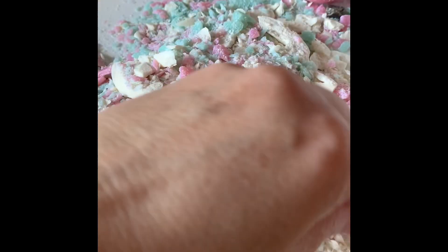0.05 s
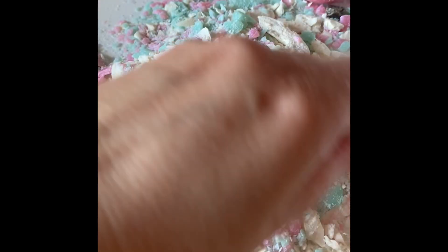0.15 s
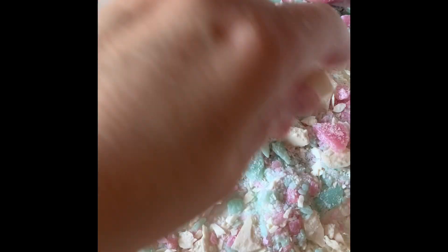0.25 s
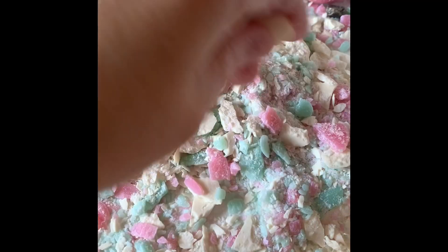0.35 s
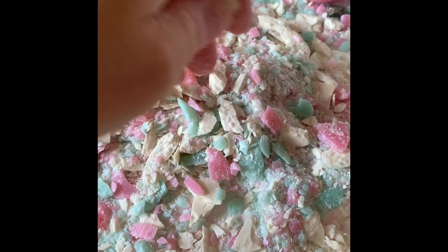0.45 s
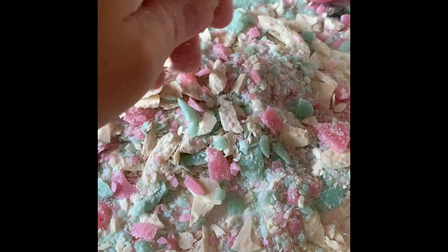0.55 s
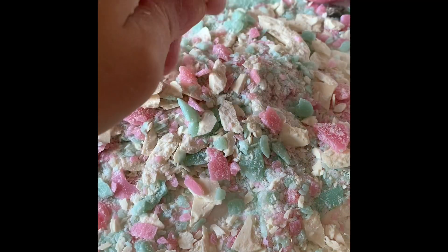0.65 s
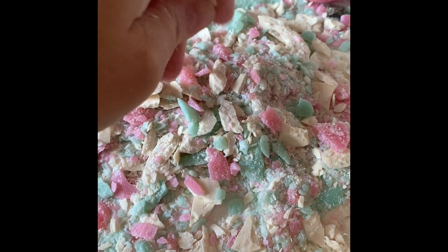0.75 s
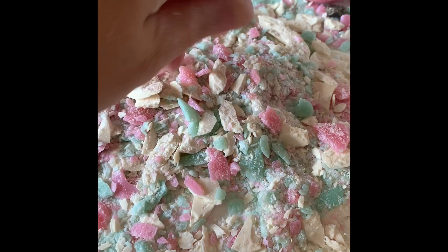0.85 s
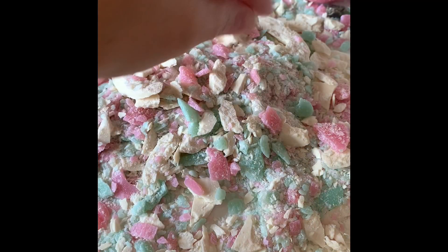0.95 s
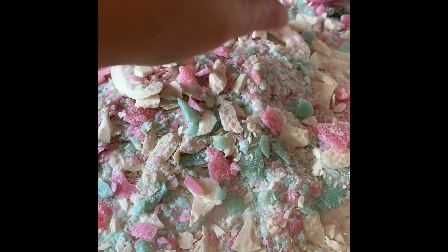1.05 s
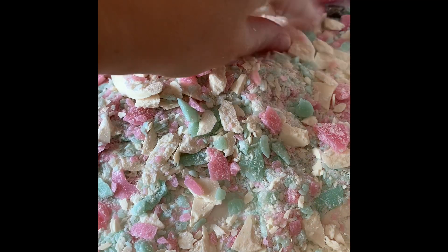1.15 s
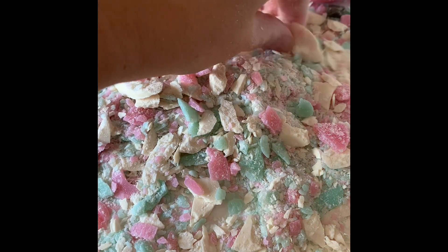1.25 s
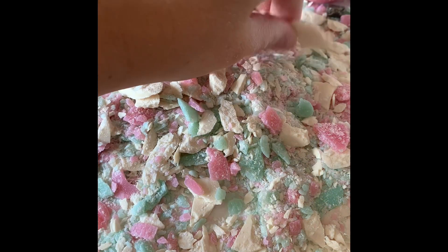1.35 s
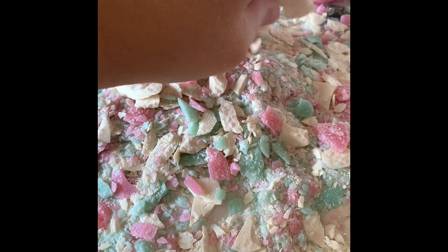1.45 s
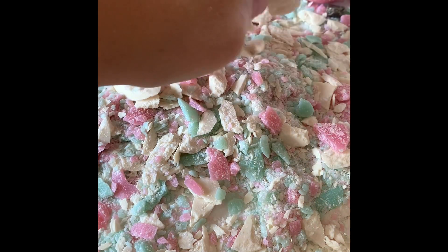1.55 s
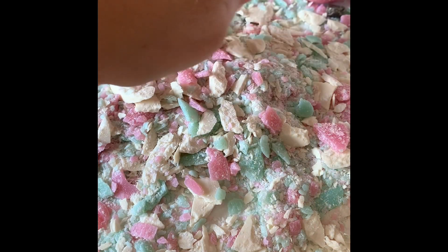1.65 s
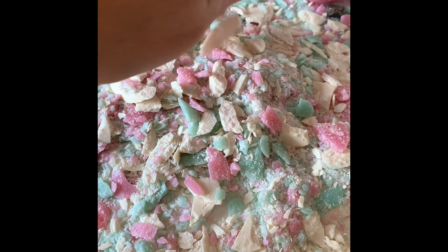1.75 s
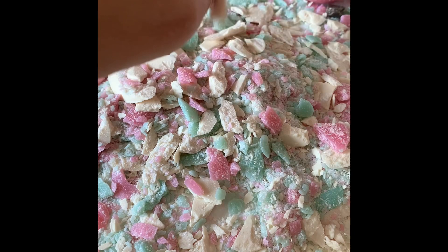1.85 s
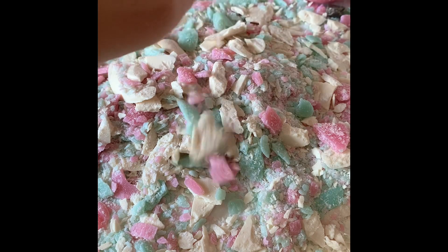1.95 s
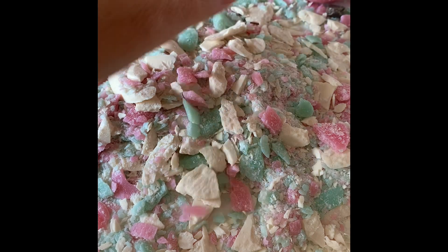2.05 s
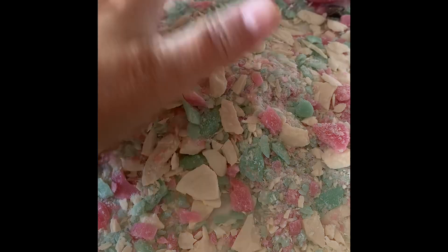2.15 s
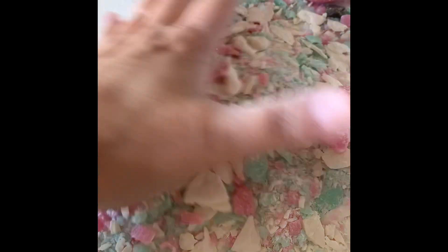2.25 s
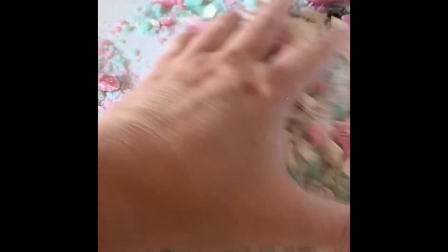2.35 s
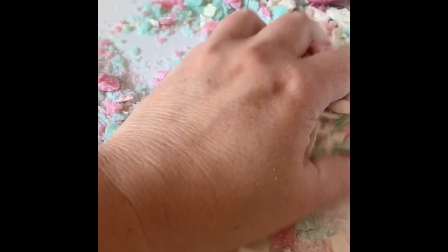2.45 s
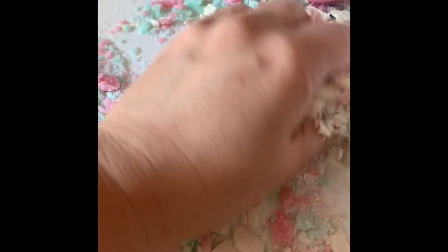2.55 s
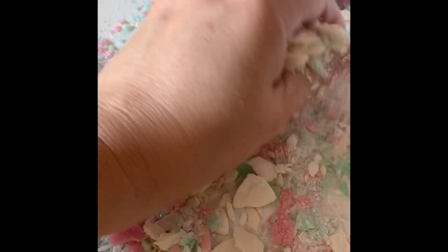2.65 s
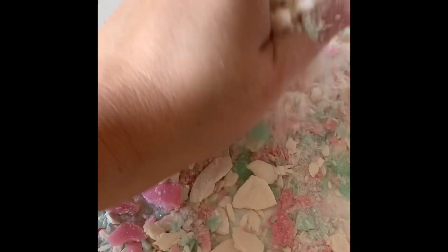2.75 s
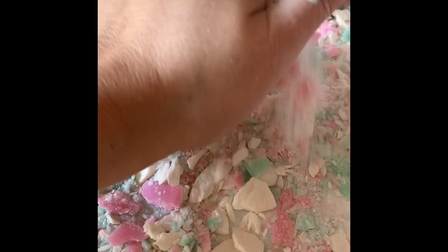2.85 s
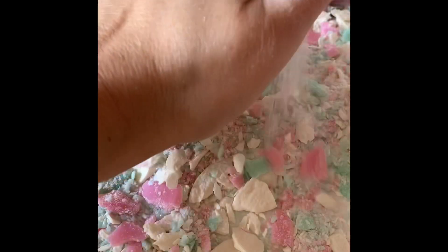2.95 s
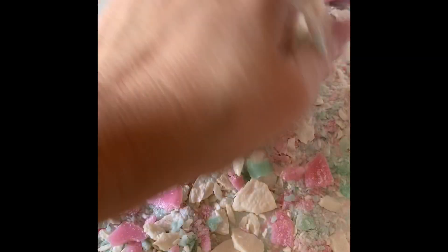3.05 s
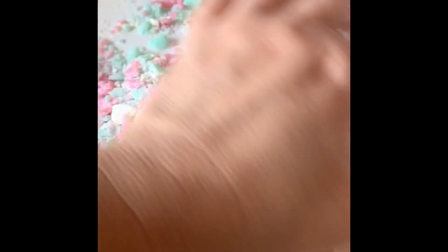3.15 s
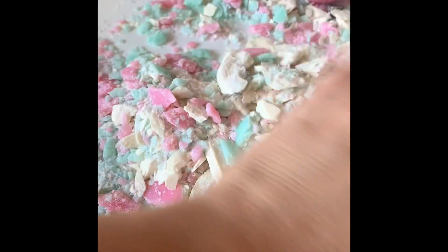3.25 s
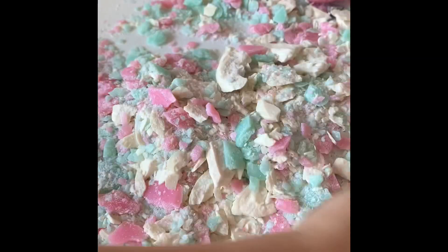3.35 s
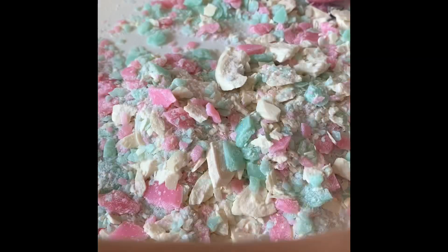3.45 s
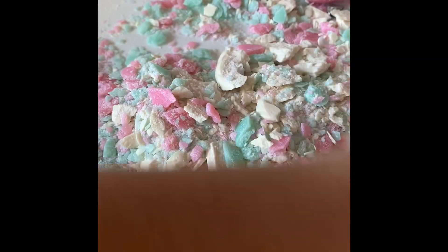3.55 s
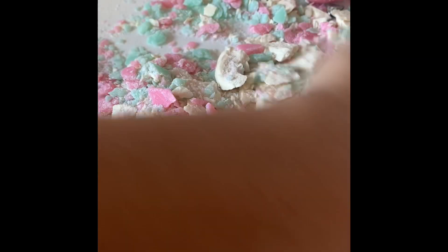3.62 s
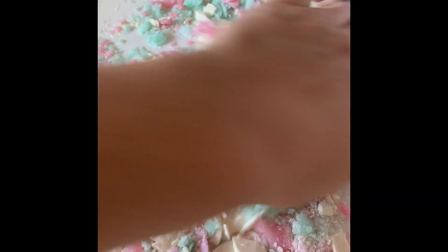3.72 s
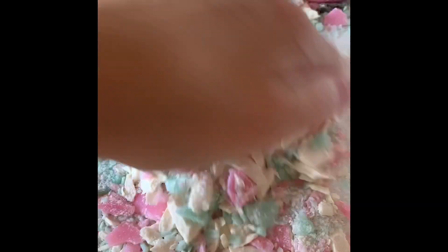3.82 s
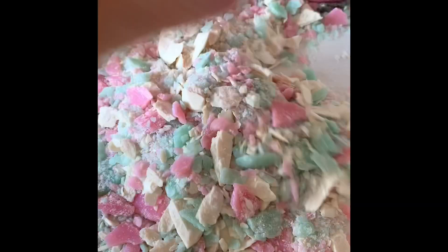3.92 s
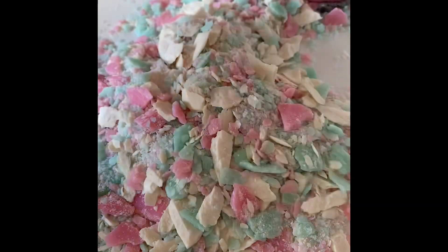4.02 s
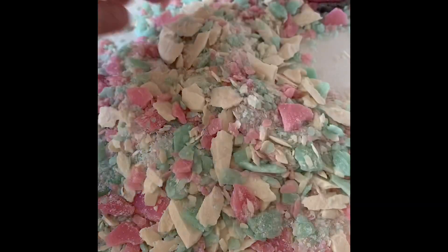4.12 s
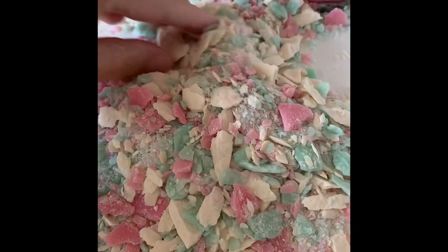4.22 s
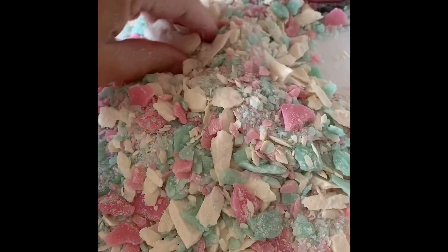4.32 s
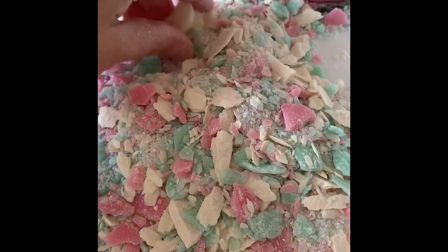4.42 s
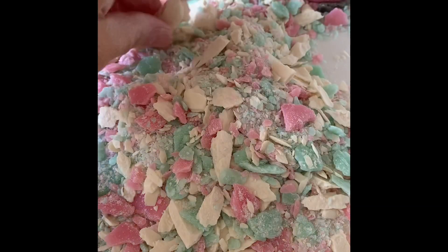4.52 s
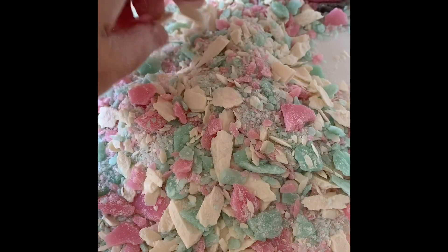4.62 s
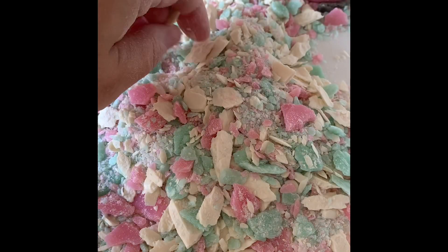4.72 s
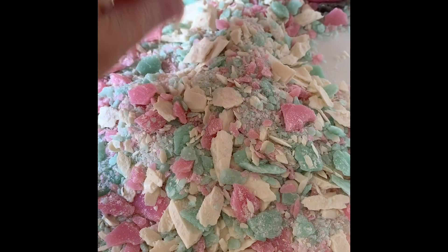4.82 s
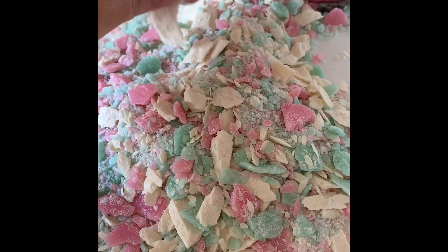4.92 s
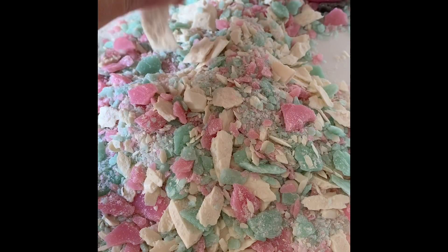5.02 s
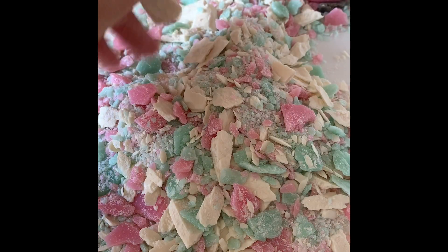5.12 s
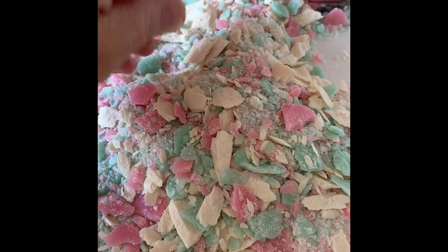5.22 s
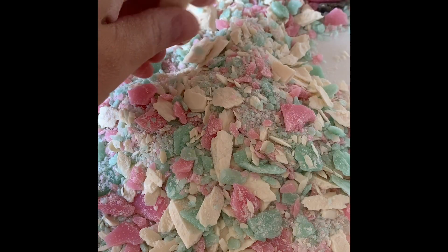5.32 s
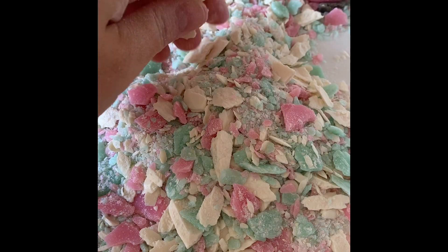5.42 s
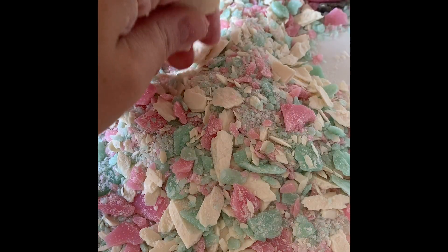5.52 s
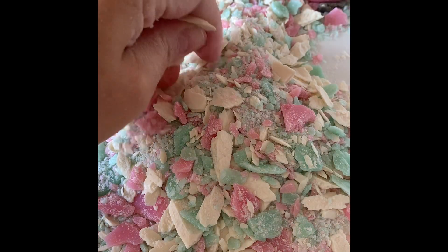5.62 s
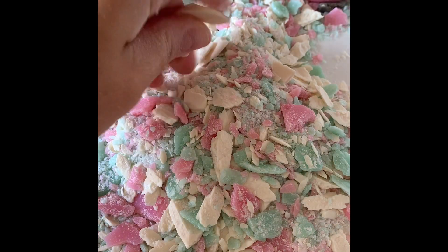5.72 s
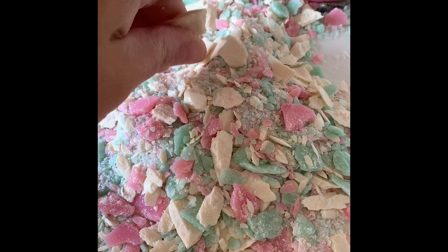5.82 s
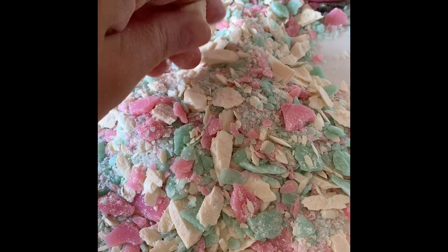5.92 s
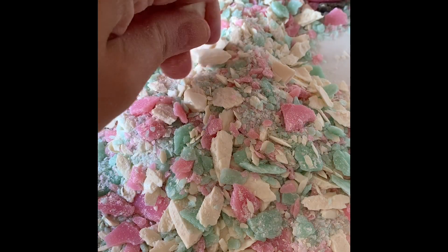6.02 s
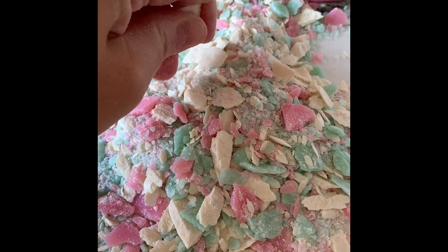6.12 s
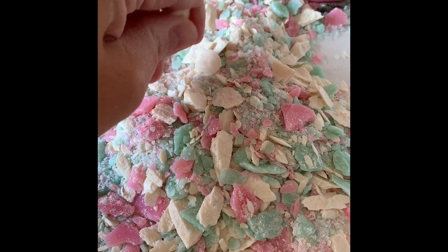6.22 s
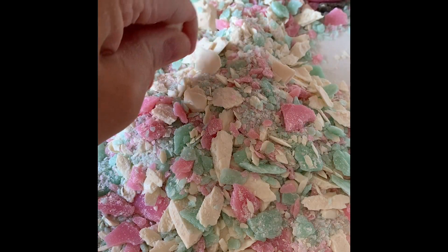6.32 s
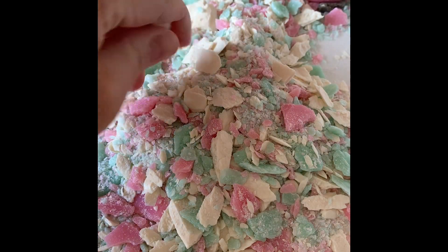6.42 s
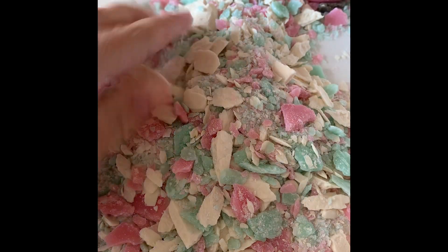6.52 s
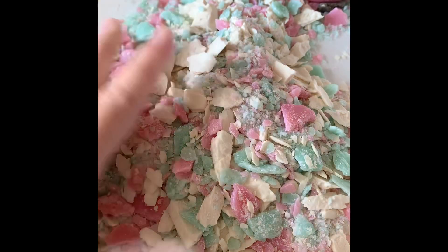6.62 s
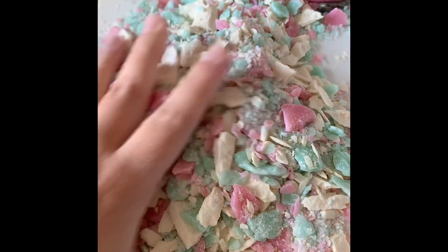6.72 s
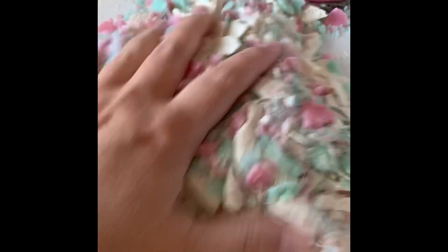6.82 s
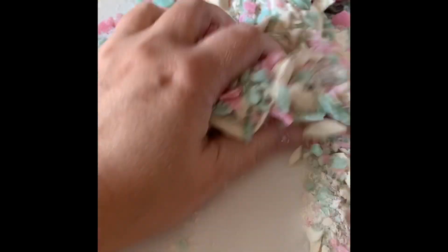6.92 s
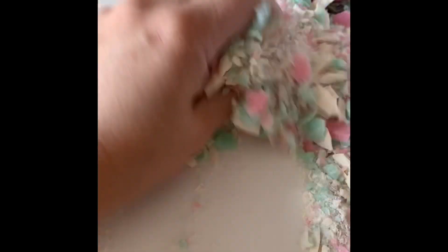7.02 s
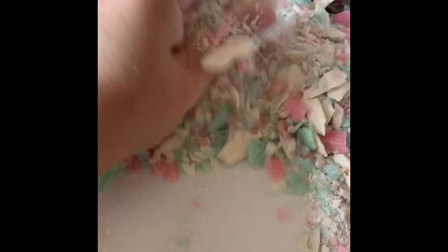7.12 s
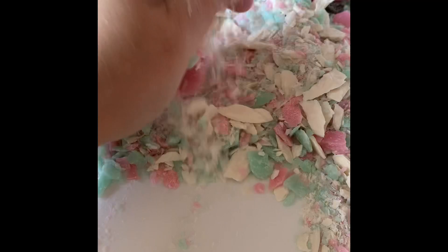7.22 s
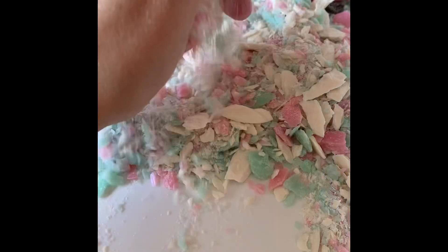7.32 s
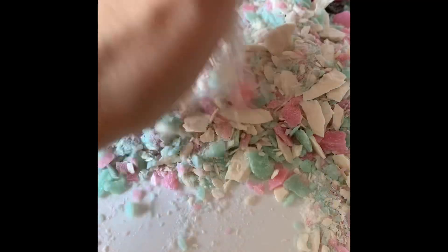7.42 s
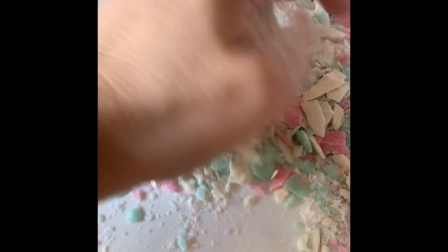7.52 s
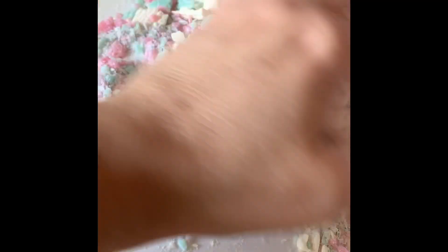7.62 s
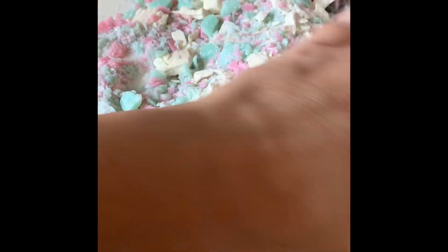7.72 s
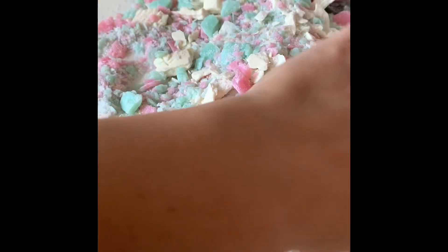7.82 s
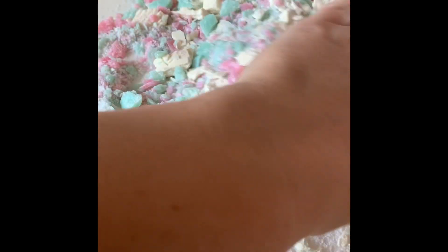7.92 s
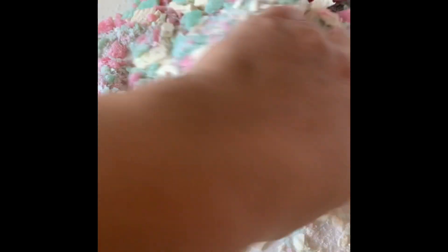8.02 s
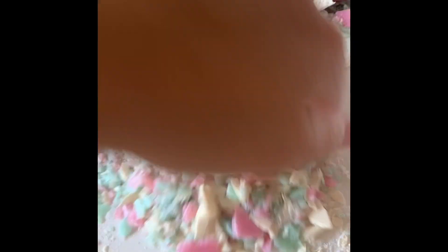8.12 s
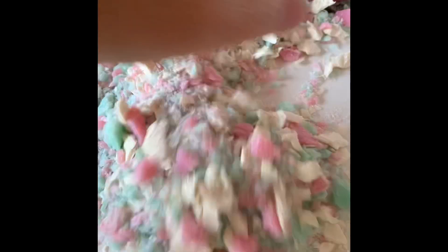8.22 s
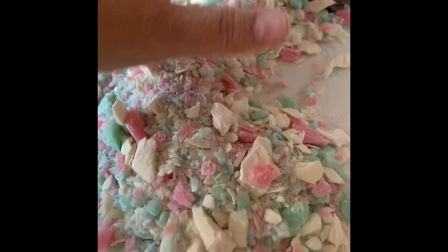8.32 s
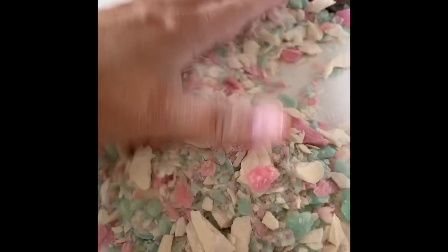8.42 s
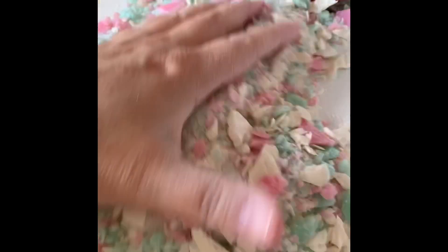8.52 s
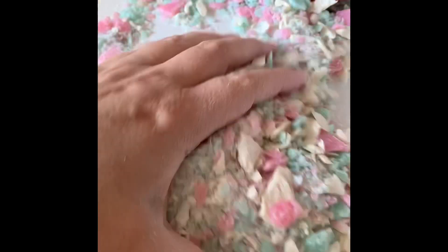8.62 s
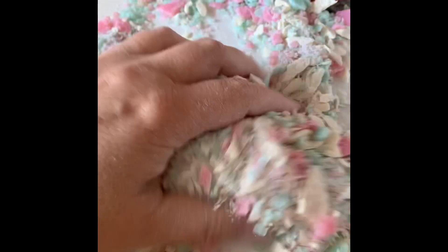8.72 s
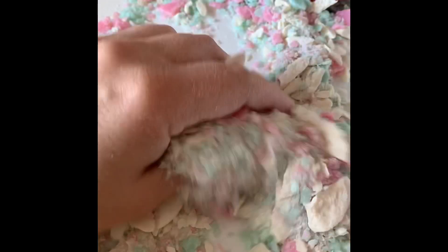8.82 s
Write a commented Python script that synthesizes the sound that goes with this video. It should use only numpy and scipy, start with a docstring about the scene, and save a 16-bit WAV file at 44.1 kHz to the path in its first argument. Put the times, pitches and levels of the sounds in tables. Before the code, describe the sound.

A low, unsteady room hum lies under close, dry sounds with a short small-room echo and a wide stereo image. Barely audible scrapes come first, then at 0.6 seconds a sharp brittle snap with a tiny thump. From 0.8 to 2 light rubbing, ticks and small knocks come in separate bursts, with a weaker snap at 1.9. From 2.2 to 3.4 the hand rakes the soap heap loudly: crunching chunks, woody clacks, cracking flakes, fizzing crumbs and soft low bumps. A smooth scraping sweep from 3.4 to 3.9 sinks in pitch. Gentle crackles and scrapes between 4.2 and 5.0 fade to near silence, broken by clear snaps at 5.5 and 6.0. Stirring restarts around 6.4 and swells at 6.7, with the hardest knocks near 7.05. Crunching strokes and rattling debris continue in waves through 8.8, then settle.

```python
"""A low, wavering room hum and faint scrapes, then a snap: a hand rakes and squeezes dry crushed soap on a table.
Chunks rub and knock (grains and dying sines over table modes), crumbs fizz (dense clicks), thin flakes crack
(ringing ticks); four times the fingers snap a piece (fracture pulse and sinking thump).
Strokes swell and settle; one long sweep, grains through moving resonances, sinks in pitch overall.
A small room answers the soap sounds; left and right differ in phase and level, varying with frequency."""
import sys
import numpy as np
from scipy import signal
from scipy.fft import rfft, irfft, next_fast_len
from scipy.io import wavfile
from scipy.ndimage import uniform_filter1d

SR = 44100
rng = np.random.default_rng(int(sys.argv[2]) if len(sys.argv) > 2 else 0)


def transcribe(signal):
    """Save signal, clipped to [-1, 1], as a 16-bit WAV file at the path in sys.argv[1]."""
    frames = np.atleast_2d(signal).T
    limited = np.clip(frames, -1, 1)
    pcm = np.round(limited * 32767).astype(np.int16)
    wavfile.write(sys.argv[1], SR, pcm)


N = 390726
TIME_S = np.arange(N) / SR

# Event levels and spectra are relative: each source trims or filters them further.
# low hum spectrum: [f/Hz, level/dB per Hz]
AIR_SPECTRUM = [(20, -24), (45, 4.5), (130, 0), (190, -5.5), (240, 0.5), (320, -15), (450, -21),
                (800, -32.5), (3000, -31), (9000, -29), (16000, -35)]
# room decay: [f/Hz, t60/s]
ROOM_DECAY = [(100, 0.42), (500, 0.19), (2000, 0.44), (6000, 0.13), (15000, 0.02)]
# room echo: [f/Hz, level/dB]
ROOM_LEVEL = [(100, -2), (500, -9), (2000, -8), (6000, -8), (15000, -20.5)]
# stereo phase: [f/Hz, lead of left/rad]
STEREO_LEAD = [(20, 0.5), (600, 0.46), (1000, 0.48), (1800, 0.13), (2400, 0.97), (2780, 2), (3600, 2),
               (4200, 1.37), (4800, 3.5), (5450, 3.5), (6400, 5), (7700, 5.5), (9500, 6.5), (11300, 10),
               (13400, 9.5), (14900, 12), (16500, 15)]
# stereo balance: [f/Hz, left minus right/dB]
STEREO_BALANCE = [(60, -2), (95, -0.5), (150, -3), (240, -5.5), (380, 1.5), (600, -5), (950, -3.5),
                  (1500, -0.1), (2380, -6.5), (2780, 0), (3200, -6.5), (3770, 0.5), (5980, -1.5), (9470, 1),
                  (15000, -0.5)]
# tabletop modes: [f/Hz, level/dB, t60/s]
TABLE_MODES = [(415, -11.5, 0.044), (520, 1.5, 0.051), (584.3, -4.5, 0.5), (1006, -11, 0.071),
               (1148, -4, 0.055), (1480, -5, 0.029), (1540, -4.5, 0.024), (2020, -11, 0.12),
               (2786, -8.5, 0.087)]
# hand bumps the table through the heap: [t/s, level/dB, f/Hz]
THUD_EVENTS = [(0.904, -47.5, 78.5), (1.157, -49, 80.5), (1.954, -43, 80), (2.206, -38, 84),
               (2.363, -22.5, 98), (3.2, -49, 80.5), (4.262, -41, 89), (4.577, -47, 99), (6.729, -33.5, 77),
               (7.549, -37.5, 122), (7.745, -33.5, 80.5), (8.417, -44, 68.4), (8.751, -35, 132)]
# piece snaps between the fingers: [t/s, crack level/dB, crack f/Hz, recoil level/dB, recoil starting f/Hz]
SNAP_EVENTS = [(0.6025, -16, 5040, -40.5, 296), (1.9408, -24.5, 10230, -49, 385),
               (5.5441, -18, 7800, -36, 249), (6.045, -25, 9300, -42.5, 320)]
# thin flake breaks: [t/s, level/dB, flake f/Hz]
CRACK_EVENTS = [(0.803, -63, 8040), (1.013, -54.5, 7000), (1.0872, -45, 6700), (1.16, -46.5, 6550),
                (1.397, -47.5, 7060), (1.4064, -45.5, 7540), (1.6432, -47, 7460), (1.619, -57, 4000),
                (1.7786, -49, 6760), (1.82, -57, 3000), (2.0135, -55, 3000), (2.566, -34.5, 3430),
                (2.5737, -46, 8800), (2.584, -35.5, 7450), (2.6835, -31, 3200), (2.7957, -46, 7250),
                (2.9048, -49, 8500), (3.1394, -45, 8100), (3.3522, -54, 2870), (3.2007, -33.5, 3140),
                (3.2235, -40, 3500), (3.284, -48, 8500), (3.2945, -36, 8400), (3.37, -37, 3780),
                (3.8638, -50, 8000), (3.8944, -45, 9150), (4.2895, -51, 3820), (4.5645, -55, 7500),
                (4.602, -35.5, 11400), (4.606, -37, 8000), (4.6741, -38, 2970), (4.7032, -38.5, 9000),
                (4.7146, -43, 2500), (4.772, -41, 2780), (4.778, -38, 6440), (4.817, -59, 6960),
                (4.9808, -47.5, 6700), (5.0185, -45, 7200), (5.1207, -48, 9800), (5.3, -57.5, 8000),
                (5.803, -64, 3000), (5.914, -70, 2400), (6.5505, -51, 7550), (6.5955, -46.5, 7500),
                (6.7125, -51, 8000), (6.7332, -32.5, 3600), (6.9031, -37, 7000), (7.008, -42, 8000),
                (7.0448, -20.5, 2860), (7.112, -35, 8560), (7.16, -37.5, 5700), (7.1886, -43.5, 7440),
                (7.295, -41, 7560), (7.4619, -34.5, 7800), (7.4932, -37.5, 7540), (7.6695, -32, 6800),
                (7.7462, -24, 5600), (8.2254, -47.5, 7500), (8.3073, -50.5, 7500), (8.35, -60, 2600),
                (8.4012, -40.5, 7700), (8.7518, -24.5, 3540), (8.7644, -34, 7300), (8.839, -38, 2800)]
# chunk strikes the table or a neighbour: [t/s, level/dB, f/Hz]
KNOCK_EVENTS = [(.078, -47.5, 1900), (.897, -44.5, 1100), (1.014, -48, 1290), (1.119, -46, 890),
                (1.158, -31, 468), (1.161, -32, 1460), (1.213, -41, 480), (1.264, -30.5, 540),
                (1.283, -35.5, 617), (1.398, -41, 1900), (1.44, -52, 553), (1.618, -49, 1500),
                (1.754, -45.5, 537), (1.781, -45, 1480), (1.819, -47.5, 1530), (1.941, -37, 1480),
                (1.947, -44, 1650), (1.953, -35.5, 480), (1.981, -44, 1700), (1.994, -37, 1610),
                (2.0, -31.5, 1840), (2.0135, -29, 1300), (2.021, -33.5, 520), (2.0531, -36.5, 1470),
                (2.169, -33.5, 456), (2.188, -33, 1430), (2.386, -21.5, 1280), (2.413, -25, 1530),
                (2.426, -33, 1400), (2.4841, -26, 616), (2.5658, -13.5, 1640), (2.643, -26.5, 690),
                (2.6841, -10.5, 1234), (2.697, -25, 1420), (2.7235, -19.5, 760), (2.7947, -23, 1350),
                (2.852, -26, 520), (2.892, -34.5, 546), (3.0185, -40, 1360), (3.129, -32, 1500),
                (3.151, -28.5, 620), (3.163, -27, 1500), (3.2008, -15, 1350), (3.223, -24.5, 1730),
                (3.297, -21.5, 1310), (3.3517, -9.5, 1710), (3.3525, -27.5, 640), (3.3685, -28, 2140),
                (3.3935, -21, 1750), (3.462, -28, 636), (3.857, -43, 1300), (3.927, -33, 920),
                (4.247, -36, 520), (4.29, -44, 1500), (4.5145, -46.5, 530), (4.7032, -28, 1420),
                (4.7143, -25.5, 1330), (4.778, -32.5, 1480), (4.982, -37.5, 660), (5.019, -38, 1390),
                (5.021, -42, 520), (5.897, -59.5, 600), (6.495, -39, 1500), (6.509, -38, 1620),
                (6.596, -36, 564), (6.685, -39, 600), (6.7334, -19, 1840), (6.816, -23.5, 440),
                (6.9034, -26.5, 1160), (6.979, -35, 544), (7.0342, -13, 1220), (7.0411, -13, 1170),
                (7.0455, -36, 1100), (7.054, -3.5, 1150), (7.061, -15.5, 594), (7.078, -26, 1170),
                (7.124, -28.5, 563), (7.154, -22.5, 1590), (7.1597, -18.5, 1540), (7.289, -27.5, 1390),
                (7.3395, -32.5, 466), (7.356, -36, 1450), (7.3835, -36, 1300), (7.5412, -24, 1220),
                (7.562, -36, 1400), (7.575, -24.5, 1320), (7.664, -26.5, 1440), (7.671, -21.5, 570),
                (7.6965, -29, 1460), (7.7465, -18.5, 1120), (8.306, -34.5, 1170), (8.327, -30.5, 1210),
                (8.35, -17.5, 2180), (8.587, -26, 1360), (8.659, -24, 1080), (8.748, -15.5, 1440),
                (8.752, -16.5, 600), (8.779, -26, 1100), (8.838, -25.5, 995)]
# palm sweep: [t/s, centre f/Hz, level/dB]
SWEEP_PATH = [(3.34, 1950, -80), (3.38, 1895, -42), (3.46, 1610, -40), (3.54, 1760, -40.5),
              (3.62, 1610, -44.5), (3.7, 1270, -44.5), (3.8, 1170, -42.5), (3.87, 987, -58.5),
              (4.049, 900, -78.5)]
# hand pushes through the heap: [start t/s, length/s, rise/s, chunk level/dB,
# edges above chunks/dB, crumbs above chunks/dB]
STROKE_EVENTS = [(0.0, .11, 0.037, -72, 4, -19), (0.123, 0.1, 0.022, -80, 1, 7),
                 (.81, 0.085, 0.075, -70.5, 2, -7), (0.885, 0.029, 0.0054, -58.5, -7, -9),
                 (0.958, 0.055, 0.036, -64, -21, -18), (1.088, .09, 0.044, -49.5, -5.5, -13.5),
                 (1.185, .085, 0.026, -51.5, -3.5, -13), (1.344, .086, .03, -54.5, -9, -15.5),
                 (1.462, 0.18, 0.024, -66, -21, -18.5), (1.595, 0.036, 0.016, -60.5, -15, -13),
                 (1.745, 0.046, 0.017, -59, -17, -15), (1.937, 0.084, 0.0068, -53, -4, -17),
                 (2.165, 0.037, 0.0069, -46, 0, -14.5), (2.228, .25, 0.065, -38, 0, -11.5),
                 (2.513, 0.17, 0.03, -46.5, 2.5, -7), (2.736, 0.19, 0.022, -51, -4.5, -9.5),
                 (2.964, 0.23, 0.055, -53.5, -2, -9), (3.098, 0.14, 0.027, -44.5, -4, -15.5),
                 (3.23, .11, .04, -53, -11, -6.5), (3.355, 0.28, 0.064, -53.5, 1, 3.5),
                 (3.492, 0.31, 0.055, -42, 0.5, -6.5), (3.81, .14, 0.037, -48, -22, -18.5),
                 (3.973, 0.099, 0.053, -59.5, -19, -25), (4.058, 0.059, .04, -67, -9.5, -28),
                 (4.198, 0.076, 0.029, -43.5, -2.5, -22.5), (4.298, 0.1, 0.032, -55.5, 2.5, -13),
                 (4.437, 0.088, 0.025, -59, 1, -13.5), (4.574, 0.034, 0.021, -60, 4.5, 2.5),
                 (4.661, .16, 0.043, -70.5, 11.5, -9.5), (4.985, 0.064, 0.012, -58, -12, -17.5),
                 (5.22, .06, .03, -79, -2.5, -6), (5.784, .03, 0.03, -77, -12, -5.5),
                 (5.873, 0.039, 0.017, -76, -10, -7), (6.388, 0.11, 0.077, -71, 8, -7),
                 (6.467, 0.054, 0.024, -52.5, -5, -6), (6.554, 0.069, 0.041, -49.5, 2.5, -17),
                 (6.678, 0.24, 0.057, -40, 4.5, -7), (6.938, 0.21, 0.041, -42.5, -5.5, -9),
                 (7.147, 0.66, .09, -53, 1, -2.5), (7.49, 0.33, 0.029, -47, -3, -7.5),
                 (7.67, .32, 0.05, -45.5, 2, -9), (7.953, .19, 0.054, -42, 1, -9),
                 (8.166, 0.17, 0.02, -46, -5.5, -14), (8.378, 0.37, 0.093, -41, 0.5, -12),
                 (8.686, 0.14, .04, -43.5, 5, -8)]
# crumbs run off the fingers: [start t/s, length/s, rise/s, level/dB]
TRICKLE_EVENTS = [(0.777, 0.16, 0.033, -65), (4.135, .1, 0.027, -68.5), (5.171, 0.029, .02, -66.5),
                  (6.399, 0.11, 0.034, -60)]
# creep between strokes: [chunk level/dB, edge level/dB, crumb level/dB]
CREEP_LEVELS = (-92, -91, -90.5)
# rubbing chunks spectrum: [f/Hz, level/dB per Hz]
CHUNK_SPECTRUM = [(30, -22), (70, -4.5), (140, -1), (210, -6.5), (300, -1.5), (460, 1), (620, -3.5),
                  (850, -8), (1200, -10), (1800, -18.5), (4000, -52.5)]
# scraping edges spectrum: [f/Hz, level/dB per Hz]
EDGE_SPECTRUM = [(400, -33), (900, -5.5), (1300, -1.5), (1650, -4), (2200, -7.5), (3000, -9), (4300, -13.5),
                 (6500, -20), (12000, -49)]
# fizzing crumbs spectrum: [f/Hz, level/dB per Hz]
CRUMB_SPECTRUM = [(800, -28), (2500, -2.5), (4000, 0), (5500, 3.5), (8000, 0), (10500, 0.5), (13000, -2.5),
                  (15800, -8.5)]
# breaking flake spectrum: [f/Hz, level/dB per Hz]
FLAKE_SPECTRUM = [(100, -5), (700, -4), (2000, -10), (3100, -0.5), (4200, -0.5), (8000, -4.5),
                  (11000, -2.5), (16000, -9)]
# chunk crumbling as it lands: [f/Hz, level/dB per Hz]
GRIT_SPECTRUM = [(80, -7), (250, -11.5), (480, 3), (900, 1.5), (1600, -0.5), (2400, -6.5), (4000, -14.5),
                 (8000, -22), (16000, -29.5)]

AIR_DB, AIR_WAVER_RMS_DB, AIR_WAVER_S = -68, 6.5, .07
BAND_LIMIT_HZ = 16050
EASE_DB_PER_S, SETTLE_DB_PER_S = 8.5, 220.5  # from a stroke's start; further fall after its length
# a thump spreads through the board, its low waves arriving last
RECOIL_SINK_S, RECOIL_FADE_S, RECOIL_RISE_S = 0.012, 0.0069, 0.00067
# random lesser flakes; level is relative to the crumbs
SPLINTERS_PER_S, SPLINTER_DB, SPLINTER_LOW_HZ, SPLINTER_HIGH_HZ = 16, 4.5, 2200, 9000
# random small chunks; level is relative to the rubbing
TOPPLES_PER_S, TOPPLE_DB, TOPPLE_LOW_HZ, TOPPLE_HIGH_HZ = 26, -1, 520, 2400
RING_CYCLES = 6.8  # t60 of a chunk in cycles: low ones ring longer
CONTACT_CYCLES = .8  # rise constant in cycles: big chunks land more softly
SWEEP_WIDTH_HZ, SWEEP_LOW_RATIO, SWEEP_LOW_DB = 970, 0.61, 0  # second resonance sinks with the first
# wandering edge resonance, as different pieces catch
CATCH_HZ, CATCH_WIDTH_HZ, CATCH_RMS_OCTAVES, CATCH_S, CATCH_DB = 1692, 350, 0.42, 0.032, 4.5
TREBLE_HZ, TREBLE_DB_PER_DB = 2100, -0.06  # edge treble per dB of level: gentler is slightly brighter


def amp(db):
    """Decibels to gain."""
    return 10 ** (np.asarray(db) / 20)


def read(points, hz):
    """A table's value at hz, on a log-frequency axis."""
    f, value = np.transpose(points)
    return np.interp(np.log(hz + 1), np.log(f + 1), value)


def add(mix, s, sound):
    """Lays a sound into the mix at time s."""
    part = mix[max(round(s * SR), 0):][:len(sound)]
    part += sound[:len(part)]


def colour(x, spectrum, size=4096):
    """A minimum-phase filter: clicks keep their sharp fronts."""
    hz = abs(np.fft.fftfreq(size, 1 / SR))
    log_gain = np.log(amp(read(spectrum, hz)))
    taps = np.fft.ifft(np.exp(np.conj(signal.hilbert(log_gain)))).real
    return signal.oaconvolve(x, taps[:size // 2])[:len(x)]


def evened(x, band_hz=(0, SR)):
    """Scales x to rms 1 within a band."""
    hz = np.fft.rfftfreq(len(x), 1 / SR)
    inside = (hz >= band_hz[0]) & (hz < band_hz[1])
    power = 2 * np.sum(abs(rfft(x)[inside]) ** 2)
    return x * len(x) / np.sqrt(power + 1e-20)


def waver(over_s):
    """A smooth random drift of rms 1."""
    width = max(int(over_s * SR), 1)
    once = uniform_filter1d(rng.standard_normal(N), width)
    return evened(uniform_filter1d(once, width))


def ring(hz, t60_s, rise_s):
    """A dying sine of peak 1 that swells over the time of contact."""
    t = np.arange(int((t60_s + rise_s) * 1.5 * SR) + 8) / SR
    decay = np.exp(-np.log(1000) * t / t60_s)
    wave = np.sin(2 * np.pi * hz * t) * decay * (1 - np.exp(-t / rise_s))
    return wave / abs(wave).max()


def burst(decay_s, size=512):
    """A short irregular fracture pulse of energy 1."""
    wave = rng.standard_normal(size) * np.exp(-np.arange(size) / SR / decay_s)
    return wave / np.linalg.norm(wave)


def grains(level_db, per_s, spread_db, decay_s, clump_db, thinning=0.23, gentle_clump_db=4.5, count=24):
    """Slips and breaks bunched by stick and slip; gentle stirring frees fewer, in separate clumps."""
    share = amp(thinning * np.maximum(level_db - level_db.max(), -45))
    size = amp(spread_db * np.minimum(rng.exponential(1, N), 3.5)) * rng.choice([-1, 1], N)
    depth = np.log(amp(clump_db + gentle_clump_db * (1 - share)))
    clumps = np.exp(depth * waver(over_s=.008) - depth ** 2)
    struck = rng.random(N) < share * per_s / SR
    clicks = size * clumps * struck / np.sqrt(share)  # thinning keeps the power
    shape = rng.integers(0, count, N)
    return sum(signal.oaconvolve(clicks * (shape == k), burst(decay_s))[:N] for k in range(count))


def resonate(x, hz, width_hz):
    """A resonance whose centre follows the curve hz: shift down, low-pass, shift back."""
    turn = np.exp(2j * np.pi * np.cumsum(hz) / SR)
    r = np.exp(-np.pi * width_hz / SR)
    low = signal.lfilter([(1 - r) ** 2], [1, -2 * r, r * r], x / turn)
    return 2 * (turn * low).real


def chance(level_db, per_s, spread_db, count=500):
    """Random small events that follow a level: rows of [t/s, level/dB, size 0-1]."""
    when, keep, strength, size = rng.random((count, 4)).T
    at = (when * N).astype(int)
    rows = np.transpose([at / SR, level_db[at] + spread_db * (strength - .5), size])
    return rows[keep < per_s * N / SR / count]


def air():
    """The low hum of the room: coloured noise with a wavering level."""
    hum = evened(colour(rng.standard_normal(N), AIR_SPECTRUM))
    return amp(AIR_DB + AIR_WAVER_RMS_DB * waver(AIR_WAVER_S)) * hum


def room(x, size=24):
    """Sparse reflections of random sign, each band dying at its own speed."""
    starts = np.arange(SR // 200, SR // 2, size)
    taps = np.zeros(SR)
    taps[starts + rng.integers(0, size, len(starts))] = rng.choice([-1., 1.], len(starts))
    hz, t, z = signal.stft(taps, SR, nperseg=256)
    t60_s = read(ROOM_DECAY, hz)[:, None]
    energy_scale = np.sqrt(2 * np.log(1000) * size / (t60_s * SR))
    z *= np.exp(-np.log(1000) * t / t60_s) * energy_scale
    tail = signal.istft(z * amp(read(ROOM_LEVEL, hz))[:, None], SR)[1]
    return signal.oaconvolve(x, tail)[:N]


def stereo(x):
    """Left and right differ in phase and level, by an amount that varies with frequency."""
    size = next_fast_len(N + SR // 10)
    hz = np.fft.rfftfreq(size, 1 / SR)
    tilt = amp(read(STEREO_BALANCE, hz) / 2)
    pair = np.array([tilt * np.exp(1j * read(STEREO_LEAD, hz)), 1 / tilt])
    return irfft(rfft(x, size) * pair, size)[:, :N]


def tabletop(x):
    """The contact itself plus the board ringing under it."""
    out = x.copy()
    for hz, db, t60_s in TABLE_MODES:
        q = hz * t60_s / 2.2
        out += amp(db) * signal.lfilter(*signal.iirpeak(hz, q, SR), x)
    return out


def push(start_s, length_s, rise_s):
    """Power of one stroke: it swells, eases off, and dies away as the debris settles."""
    t = TIME_S - start_s
    rise = .5 + .5 * np.tanh((t - rise_s / 2) / (0.44 * rise_s))
    fall_db = EASE_DB_PER_S * np.maximum(t, 0) + SETTLE_DB_PER_S * np.maximum(t - length_s, 0)
    return (rise * amp(-np.minimum(fall_db, 150))) ** 2


def stirring():
    """Levels in dB of chunks, edges and crumbs: powers of strokes and trickles add up."""
    power = amp(CREEP_LEVELS)[:, None] ** 2 * np.ones(N)
    for start_s, length_s, rise_s, db, edge_db, crumb_db in STROKE_EVENTS:
        gains = amp([db, db + edge_db, db + crumb_db])[:, None]
        power += gains ** 2 * push(start_s, length_s, rise_s)
    for start_s, length_s, rise_s, db in TRICKLE_EVENTS:
        power[2] += amp(db) ** 2 * push(start_s, length_s, rise_s)
    return 10 * np.log10(power)


def thuds():
    """The weight of the hand arrives as a low, quickly damped push."""
    out = np.zeros(N)
    for s, db, hz in THUD_EVENTS:
        add(out, s, amp(db) * ring(hz, t60_s=0.05, rise_s=0.0023))
        add(out, s, amp(db - 5.0) * ring(hz * 1.4, t60_s=0.058, rise_s=0.0034))
    return out


def recoil_thump(hz):
    """A bending wave in the tabletop: it sinks in pitch as it dies away."""
    t = np.arange(SR // 8) / SR
    turns = hz * RECOIL_SINK_S * np.log(1 + t / RECOIL_SINK_S)
    wave = np.sin(2 * np.pi * turns) * np.exp(-t / RECOIL_FADE_S) * (1 - np.exp(-t / RECOIL_RISE_S))
    return wave / abs(wave).max()


def snaps(ragged):
    """A fracture rings the piece; the recoil gives a sinking thump and a brief higher knock."""
    fracture, recoil, grit = np.zeros((3, N))
    for s, db, hz, recoil_db, recoil_hz in SNAP_EVENTS:
        crack = ragged * (burst(decay_s=0.0042) + .5 * burst(decay_s=0.0014))
        crack[0] += np.sqrt(max(1 - ragged ** 2, 0))
        piece = signal.lfilter(*signal.iirpeak(min(hz, SR / 3), 2.5, SR), crack)
        add(fracture, s, amp(db + 11.0) * (crack + 1.4 * piece))
        add(recoil, s, amp(recoil_db) * recoil_thump(recoil_hz))
        add(grit, s, amp(db + 7.5) * burst(decay_s=0.0038))
        add(recoil, s, amp(recoil_db - 10) * ring(recoil_hz * 3.2, t60_s=0.0074, rise_s=0.00055))
    return colour(fracture, FLAKE_SPECTRUM) + colour(grit, GRIT_SPECTRUM) + recoil


def cracks(crumb_db):
    """Flakes break with a tick and ring briefly at their own pitch; random splinters follow the crumbs."""
    splinters = [(s, db, SPLINTER_HIGH_HZ * (SPLINTER_LOW_HZ / SPLINTER_HIGH_HZ) ** size)
                 for s, db, size in chance(crumb_db + SPLINTER_DB, SPLINTERS_PER_S, spread_db=11.0)]
    out = np.zeros(N)
    for s, db, hz in list(CRACK_EVENTS) + splinters:
        tick = burst(decay_s=0.0017)
        flake = signal.lfilter(*signal.iirpeak(min(hz, SR / 3), 3.0, SR), tick)
        add(out, s, amp(db + 20.0) * (tick + 2.1 * flake))
    return colour(out, FLAKE_SPECTRUM)


def knocks(chunk_db):
    """Each chunk gives a few dull cycles, sheds grit as it settles, and sets the table ringing."""
    topples = [(s, db, TOPPLE_HIGH_HZ * (TOPPLE_LOW_HZ / TOPPLE_HIGH_HZ) ** size)
               for s, db, size in chance(chunk_db + TOPPLE_DB, TOPPLES_PER_S, spread_db=12.0)]
    body, grit = np.zeros(N), np.zeros(N)
    for s, db, hz in list(KNOCK_EVENTS) + topples:
        contact_s, t60_s = CONTACT_CYCLES / hz, RING_CYCLES / hz
        add(body, s, amp(db - 6.0) * ring(hz, t60_s, contact_s))
        add(body, s, amp(db - 20.5) * ring(hz * 2.177, t60_s, contact_s))
        add(grit, s, amp(db + 10) * burst(decay_s=contact_s + 0.0009, size=1536))
        add(grit, s, amp(db + 13.0) * burst(decay_s=0.0068, size=1536))
    return tabletop(body + colour(grit, GRIT_SPECTRUM))


def sweep():
    """The palm drags shavings along; their dense scrape sounds through two sinking resonances."""
    s, centre_hz, db = np.transpose(SWEEP_PATH)
    hz = np.interp(TIME_S, s, centre_hz)
    level_db = np.interp(TIME_S, s, db, left=-120, right=-120)
    slips = grains(level_db, per_s=5000, spread_db=-2.0, decay_s=0.0003, clump_db=1.35)
    upper = resonate(slips, hz, SWEEP_WIDTH_HZ)
    lower = resonate(slips, hz * SWEEP_LOW_RATIO, SWEEP_WIDTH_HZ * SWEEP_LOW_RATIO)
    scrape = upper + amp(SWEEP_LOW_DB) * lower
    thinned = signal.lfilter(*signal.butter(2, 520, "high", fs=SR), scrape)
    return amp(level_db - 0.5) * evened(thinned)


def tilt_treble(x, level_db):
    """Raises the treble slightly as the level falls."""
    low = signal.sosfiltfilt(signal.butter(4, TREBLE_HZ, fs=SR, output="sos"), x)
    return low + (x - low) * amp(TREBLE_DB_PER_DB * np.maximum(level_db - level_db.max(), -25))


def heap(chunk_db, edge_db, crumb_db):
    """Three sizes of debris slide under the hand: the smaller, the brighter."""
    chunks = grains(chunk_db, per_s=1800, spread_db=0.5, decay_s=0.00096, clump_db=1.76)
    chunks = tabletop(colour(chunks, CHUNK_SPECTRUM))
    edges = grains(edge_db, per_s=700, spread_db=0.5, decay_s=0.00053, clump_db=0.5)
    edges = tabletop(colour(edges, EDGE_SPECTRUM))
    catch_hz = CATCH_HZ * 2 ** (CATCH_RMS_OCTAVES * waver(CATCH_S))
    edges += amp(CATCH_DB) * resonate(edges, catch_hz, CATCH_WIDTH_HZ)
    edges = tilt_treble(edges, edge_db)
    crumbs = grains(crumb_db, per_s=8300, spread_db=-2.0, decay_s=0.00024, clump_db=0.98,
                    gentle_clump_db=1.5)
    crumbs = colour(crumbs, CRUMB_SPECTRUM)
    chunks = evened(chunks, (300, 1100)) * amp(chunk_db - 1.5)
    edges = evened(edges, (1200, 2400)) * amp(edge_db - 5.5)
    crumbs = evened(crumbs, (6800, 9800)) * amp(crumb_db - 4.0)
    return chunks + edges + crumbs


def scene():
    """Soap and table, their echo, and the low hum of room air."""
    chunk_db, edge_db, crumb_db = stirring()
    debris = heap(chunk_db, edge_db, crumb_db) + sweep() + knocks(chunk_db) + cracks(crumb_db) + thuds()
    # a snap is ragged in any one direction; the room gathers all directions into an even pulse
    ahead, around = debris + snaps(ragged=1), debris + snaps(ragged=0.18)
    # a second echo, opposite in sign left and right, widens the treble
    scattered = signal.lfilter(*signal.butter(1, 800, "high", fs=SR), room(around))
    heard = stereo(ahead + amp(-1.0) * room(around) + air())
    return heard + amp(-8.5) * np.array([scattered, -scattered])


def record(dry):
    """The microphone's bass roll-off and the upper band limit."""
    thinned = signal.sosfilt(signal.butter(3, 40, "high", fs=SR, output="sos"), dry)
    low_pass = signal.firwin(401, BAND_LIMIT_HZ, window=("kaiser", 9), fs=SR)
    return signal.oaconvolve(thinned, low_pass[None], "same")


dry = scene()
out = record(dry)
transcribe(out)
```